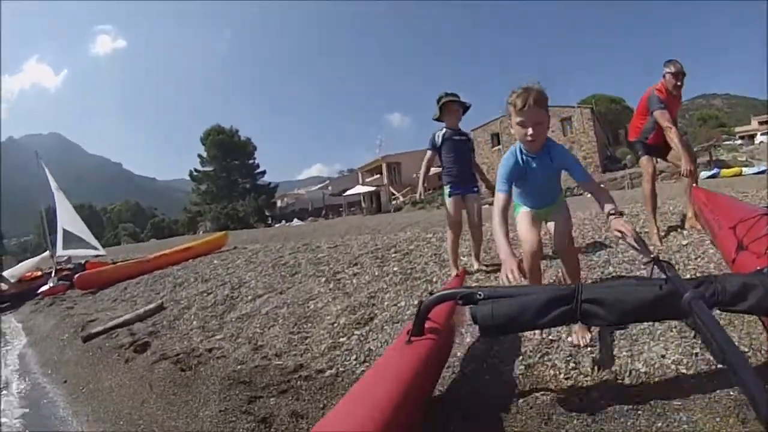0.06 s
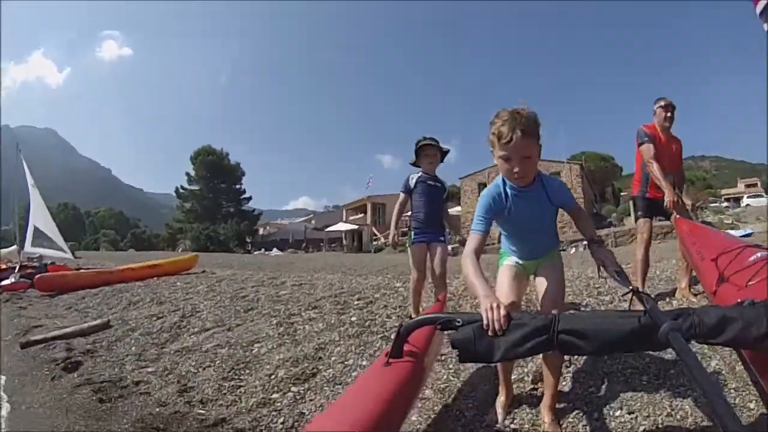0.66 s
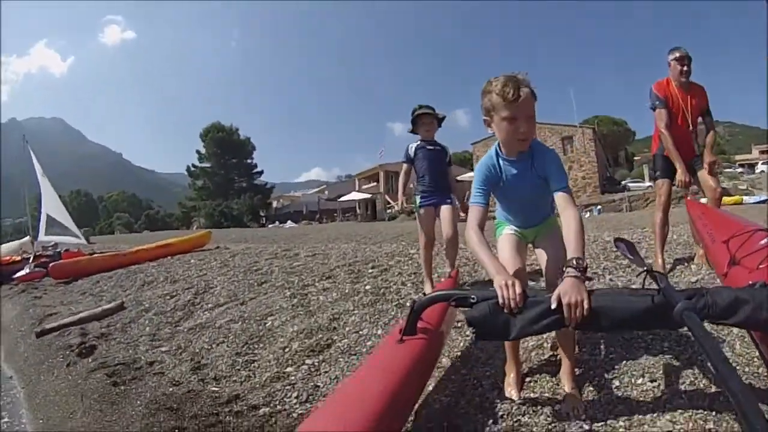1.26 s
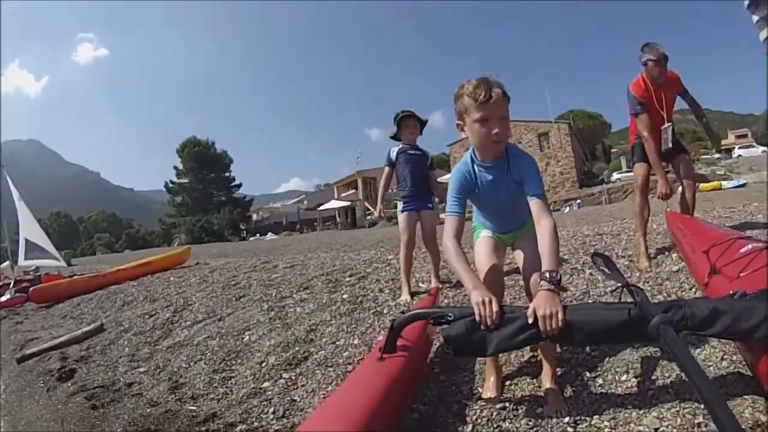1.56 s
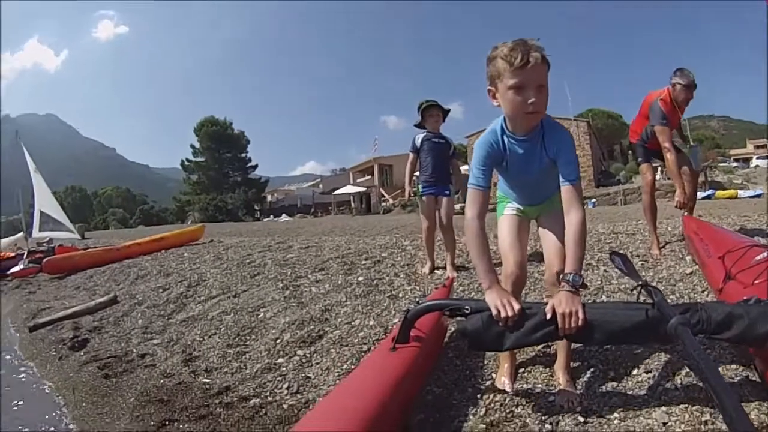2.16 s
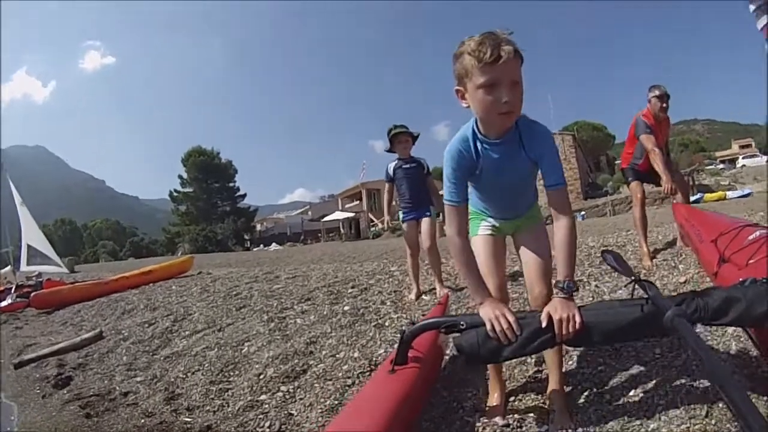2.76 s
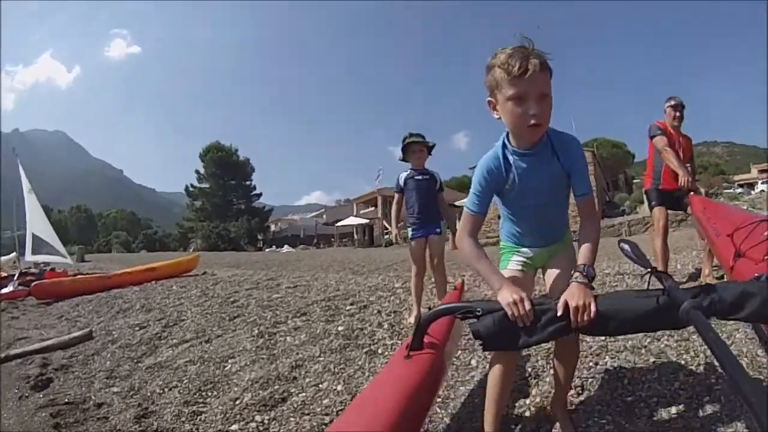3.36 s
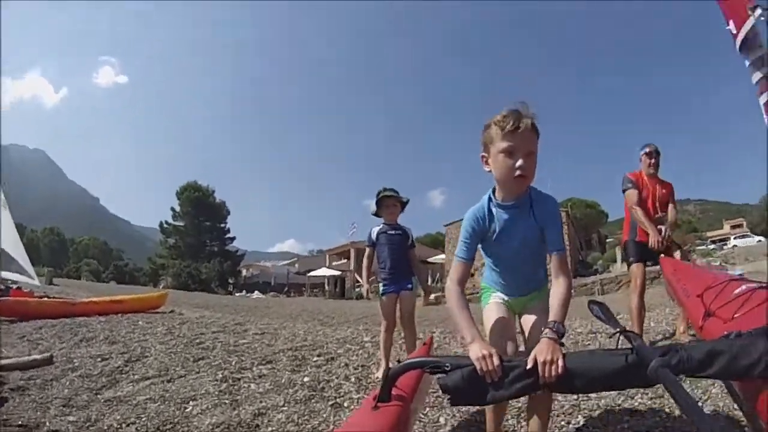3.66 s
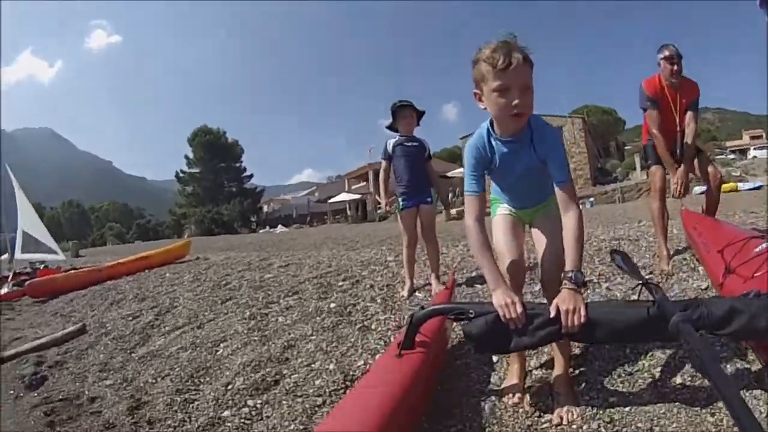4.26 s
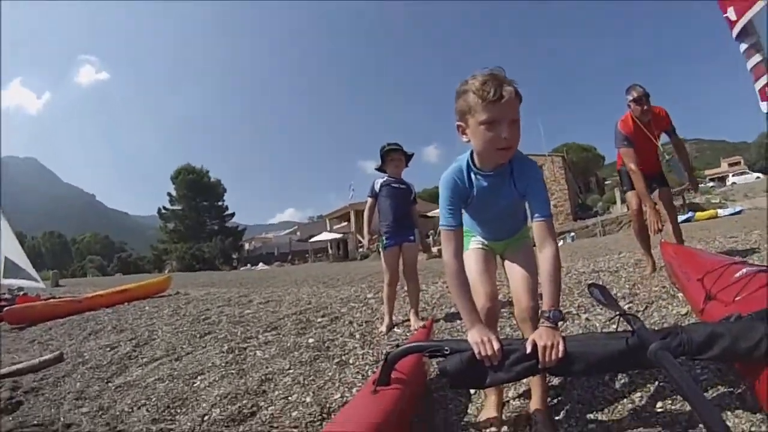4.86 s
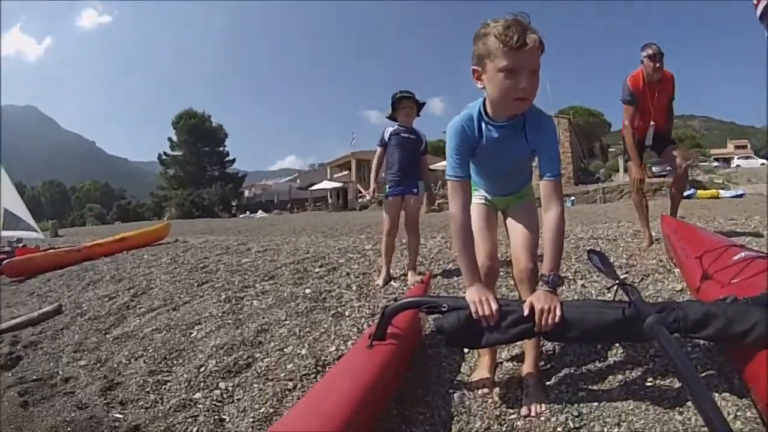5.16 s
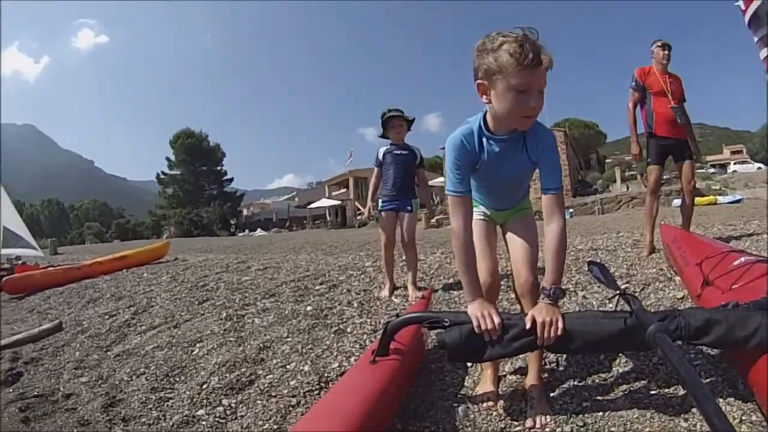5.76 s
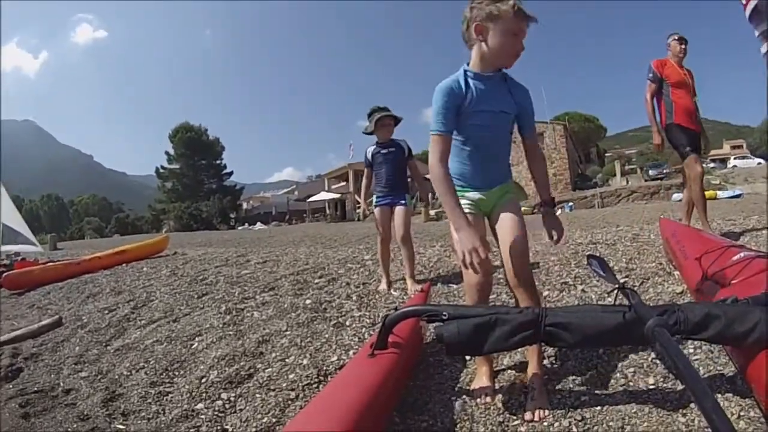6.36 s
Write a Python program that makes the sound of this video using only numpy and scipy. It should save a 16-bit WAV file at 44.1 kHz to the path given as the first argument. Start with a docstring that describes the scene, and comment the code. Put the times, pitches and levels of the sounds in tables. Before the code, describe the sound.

Sharp, hollow knocks and juddering scrapes as a plastic boat hull is dragged in short pulls across a pebble shore.

```python
"""Booming knocks and gritty scrapes: a plastic outrigger kayak is hauled up a pebble beach in short tugs.
At each tug the frame knocks and the hull booms, rebounds and judders in stick-slip.
Between knocks pebbles grind and rumble under the hull, sand trickles and the shore washes faintly.
Heard from a camera fixed to the frame; its limiter flattens the loudest knocks and recovers slowly."""
import sys
import numpy as np
from scipy import signal
from scipy.fft import rfft, irfft
from scipy.io import wavfile
from scipy.ndimage import uniform_filter1d, minimum_filter1d

SR = 44100
rng = np.random.default_rng(int(sys.argv[2]) if len(sys.argv) > 2 else 0)


def dump_mix(stems):
    """Bounce the given channels to the path in sys.argv[1] as a 16-bit WAV at rate SR."""
    frames = np.atleast_2d(stems).T  # one column per channel
    limited = np.clip(frames, -1, 1)  # hard clip at full scale
    pcm = np.round(limited * 32767).astype(np.int16)
    wavfile.write(sys.argv[1], SR, pcm)


N = 283122
T = np.arange(N) / SR
RING_S = 0.16
HARD_DB = -4  # heavier blows overload with a tick and throw the hull up

# blows on the frame: (time [s], level [dB], clack [relative dB], thud [relative dB],
# second contact [relative dB], hollow mode lift [dB], snap lift [dB])
KNOCKS = [(0.0554, 8.5, -5, -19, -34, 0, 15.5), (0.608, -28.5, -6.5, -4, -23, 0, -1),
          (0.683, -28.5, -20.5, 7, -5, -9, -3), (0.849, -32, -30, 1.5, -21, 4, -3),
          (1.1825, -7.5, -13, -10.5, -11, -2.5, 1), (1.2863, 3, -13, -17, -14.5, 2, 1),
          (1.353, -26.5, -4, 3.5, -17, -6.5, 3), (1.375, -22, -37, 5, -2.5, 0.5, -3.5),
          (1.6796, -23.5, 2, -21, -36, -2, -8), (1.783, -16, -3, -9, -12.5, -2, -5),
          (1.957, -39, -21, 1, -1, -2, -3), (2.1324, 1, -10, -16, -18.5, 0.5, -10),
          (2.195, -35.5, -33.5, 8.5, -16.5, -6.5, -6), (2.3508, 6.5, -18.5, -15, -23, -6, 10.5),
          (2.4263, -13.5, -14, 0, -1, -3.5, 12.5), (2.566, -18.5, -5, -14, -15, 3, -3),
          (2.602, -30.5, -8, 2.5, -3, 0, -3), (2.671, -26.5, 4.5, -20, -24, 8, -3),
          (3.2917, 10.5, -16, -18, -26, 1, 14), (3.784, -28.5, -30, -1, -3.5, 0, 1),
          (4.048, -20.5, 6, -0.5, -8, -7.5, -7.5), (4.071, -29.5, -14, 9.5, -16, -3, -3),
          (4.105, -30, 3.5, -12, -13, -3, -1), (4.192, 11.5, -11.5, -16, -3, 0.5, 8),
          (4.277, -13.5, 2.5, -8.5, -22, 6.5, 7), (4.352, -20, -9, -0.5, 0, -11, -1),
          (4.67, -39.5, 7.5, -18, -14, -6, -8), (4.938, -27, -27, 3, -2.5, 1, -3),
          (5.1159, 7.5, -15.5, -12, -34.5, -4.5, 9), (5.126, 6.5, -7.5, -13, -15, 4.5, 3),
          (5.616, -45, -16, 11, -2, -4, 6)]


def knocks(settle_s=0.013, scatter_s=0.0005):
    """Each knock is a blow, then a second contact as the hull settles."""
    out = np.zeros(N)
    for start_s, level_db, clack_db, thud_db, second_db, hollow_db, snap_db in KNOCKS:
        add(out, start_s, blow(level_db, clack_db, thud_db, hollow_db, snap_db))
        second_s = start_s + settle_s + scatter_s * rng.standard_normal()
        add(out, second_s, blow(level_db + second_db, clack_db, thud_db, hollow_db, snap_db))
    return out


def blow(level_db, clack_db, thud_db, hollow_db, snap_db):
    """A blow rings the hull, with a gritty crack and a snap of the frame's upper modes."""
    t = T[:int(RING_S * SR)]
    tilt_db_per_oct = 0.73 * np.clip(clack_db + 10, -15, 8)  # harder is brighter
    thud, boom, clack = hull_ring(tilt_db_per_oct, hollow_db)
    clack *= 1 - np.exp(-t / 0.002)  # the plastic gives before it rings
    grit = rng.standard_normal(len(t)) * rng.exponential(size=len(t))
    crack = unit(colour(grit, [(570, -8.5), (710, 5), (890, 3.5), (1130, 6), (1480, 12.5), (1800, -8.5),
                               (2200, -8.5), (2800, -14), (3300, -22.5), (5200, -21), (8000, -36.5),
                               (15000, -49.5)]))
    crack *= (1 - np.exp(-t / 0.0026)) * np.exp(-t / 0.0043)
    attack = emphasise(undb(-9) * clack + undb(-12.5) * crack, hz=2450, width_hz=670, db=snap_db)
    tick = overload_tick(grit, level_db) if level_db > HARD_DB else 0
    return undb(level_db) * (tick + undb(-1.5) * boom + undb(thud_db) * thud + undb(clack_db) * attack)


def hull_ring(tilt_db_per_oct, hollow_db=0, scatter_db=2, detune=0.033, travel_s=0.0013,
              rise_cycles=0.54):
    """Damped low, middle and high modes: thud, boom and clack, each with peak 1."""
    # hull and frame modes: (frequency [Hz], t60 [s], level [dB])
    hull_modes = [(43.5, 0.2, -4.5), (115.1, 0.13, 0.5), (172, 0.092, -12), (234.7, 0.06, 2),
                  (287.9, 0.05, 6.5), (486, 0.032, -7.5), (468, 0.047, -1), (705, .034, 2),
                  (740, 0.0078, -6), (1079, 0.023, 4.5), (1230, .014, -7), (1542, 0.019, -3.5),
                  (2133, 0.017, -17), (2360, 0.006, -23.5), (2713, 0.015, -20)]
    hz, t60_s, db = np.transpose(hull_modes)
    pitch_draw, level_draw = rng.standard_normal((len(hz), 2)).T
    # high bending waves travel faster: the clack arrives before the boom
    t = np.maximum(T[:int(RING_S * SR)] - travel_s * np.sqrt(hz[0] / hz)[:, None], 0)
    cycles = t * (hz * (1 + detune * pitch_draw))[:, None]
    db = db + hollow_db * ((hz > 400) & (hz < 950))  # depends on where the blow lands
    gain = undb(db + tilt_db_per_oct * np.log2(hz / hz[0]) + scatter_db * level_draw)
    gain *= (-1) ** np.arange(len(hz))  # neighbours swing in opposition, so the boom swells
    envelope = np.exp(-np.log(1000) * t / t60_s[:, None]) * (1 - np.exp(-(cycles / rise_cycles) ** 2))
    modes = gain[:, None] * np.sin(2 * np.pi * cycles) * envelope
    groups = [modes[band].sum(0) for band in (hz < 150, (hz >= 150) & (hz < 600), hz >= 600)]
    return [group / np.abs(group).max() for group in groups]


def overload_tick(grit, blow_db, delay_s=0.0055, width_s=0.001):
    """A sharp, bright tick of overload on the loudest knocks, growing with the blow."""
    # tick spectrum: (frequency [Hz], level [dB])
    spectrum = [(2500, -9.5), (3400, -2), (4800, 0.5), (7000, -4), (10000, -17.5), (15000, -17.5)]
    tick = colour(grit * np.exp(-np.abs(T[:len(grit)] - delay_s) / width_s), spectrum)
    return undb(-51 + 1.08 * blow_db) * tick / (np.abs(tick).max() + 1e-12)


def scrapes(unevenness=0.23, rasp_q=3.5):
    """Stick-slip makes the hull judder while crushed grit crunches and rasps."""
    # hull slides: (centre [s], length [s], slip rate [1/s], judder [dB], grit [dB], rasp [Hz])
    slides = [(0.864, 0.18, 198, -50, -59.5, 2500), (1.413, 0.03, 290, -31.5, -62, 1400),
              (1.537, 0.17, 470, -43, -51, 2200), (2.102, 0.08, 370, -38.5, -54.5, 1400),
              (2.6, 0.1, 198, -23.5, -58, 1300), (2.789, 0.25, 300, -40.5, -57.5, 1280),
              (2.98, 0.11, 325, -44, -59, 1280), (3.691, 0.19, 340, -47, -58, 1530),
              (3.94, 0.11, 200, -48, -54, 4700), (4.042, 0.049, 430, -30, -45.5, 2400),
              (4.083, 0.096, 235, -22.5, -50.5, 1270), (4.286, 0.068, 480, -23.5, -33.5, 1500),
              (4.469, 0.1, 244, -33, -72, 1290), (4.884, 0.12, 313, -41, -75, 1300),
              (5.589, 0.22, 330, -53, -57, 2630)]
    out = np.zeros(N)
    for centre_s, length_s, slips_per_s, judder_db, grit_db, rasp_hz in slides + rebounds():
        tilt_db_per_oct = -11 + 12.5 * np.log2(slips_per_s / 370)  # faster is brighter
        _, boom, _ = hull_ring(tilt_db_per_oct)
        n, start_s = int(length_s * SR), centre_s - length_s / 2
        swell = np.hanning(n)
        gaps = np.abs(1 + unevenness * rng.standard_normal(int(length_s * slips_per_s) + 2))
        at = (np.cumsum(gaps) / slips_per_s * SR).astype(int)
        slips = np.zeros(n)
        slips[at[at < n]] = 1
        judder = signal.fftconvolve(slips * swell, boom)
        grit = colour(contacts(per_s=2200, spread_db=3, size=n),
                      [(500, -16.5), (900, -1.5), (1500, 8), (2000, -9.5), (2450, 1), (3600, -11.5),
                       (7500, -17), (12000, -47.5)])
        grit = emphasise(grit, rasp_hz, rasp_hz / rasp_q, db=6.5)
        add(out, start_s - 0.005, undb(judder_db) * np.sqrt(2) * judder / np.abs(judder).max())
        add(out, start_s, undb(grit_db) * unit(grit) * swell)
    return out


def rebounds(delay_s=0.076, length_s=0.026, slips_per_s=370, rasp_hz=1300, cap_db=-22.5):
    """Scrape rows for the landing after each heavy blow; pebbles cushion the judder to a cap."""
    return [(start_s + delay_s, length_s, slips_per_s, min(db - 29, cap_db), db - 58, rasp_hz)
            for start_s, db, *_ in KNOCKS if db > HARD_DB]


def shudders(waver=0.17, rough_db=2.5):
    """The hull's floor wobbles unevenly for a few cycles as it rides over a stone."""
    # floor wobbles: (centre [s], length [s], pitch [Hz], level [dB])
    wobbles = [(0.728, 0.083, 95, -40), (1.172, 0.094, 86, -24), (1.404, .09, 100, -25.5),
               (1.703, .05, 128, -28.5), (2.203, .055, 107.3, -21.5), (2.622, .07, 123.7, -22),
               (3.747, 0.056, 102, -36), (4.509, 0.072, 110, -35), (4.678, .07, 115, -52),
               (4.975, 0.0874, 124.4, -29.5), (5.151, 0.065, 109.5, -17), (5.213, .08, 107.3, -32),
               (5.637, 0.057, 101, -45), (6.069, 0.093, 104, -43), (6.179, 0.13, 116, -43)]
    out, drift, push = np.zeros(N), walk(per_s=110), walk(per_s=80)
    for centre_s, length_s, hz, db in wobbles:
        n, i = int(length_s * SR), int((centre_s - length_s / 2) * SR)
        phase = 2 * np.pi * np.cumsum(hz * (1 + waver * drift[i:i + n])) / SR
        add(out, i / SR, np.sin(phase) * np.hanning(n) * undb(db + rough_db * push[i:i + n]))
    return out


def taps(rattle_s=0.0033, ring_cycles=7.5):
    """Stones flicked against the frame rattle and ring; the smaller and higher, the shorter."""
    # stone hits: (time [s], pitch [Hz], level [dB])
    stones = [(0.556, 1170, -51), (1.1292, 1360, -38), (1.9624, 1510, -47), (3.1935, 2540, -49),
              (3.4455, 2390, -43), (4.624, 1300, -49), (5.0742, 1480, -39.5), (5.4313, 6800, -63),
              (5.6218, 7600, -58), (5.6443, 6980, -55), (5.68, 2400, -45), (5.7445, 8000, -57),
              (5.935, 1367, -42)]
    out, t = np.zeros(N), T[:SR // 16]
    for start_s, hz, db in stones:
        rattle = rng.standard_normal(len(t)) * np.exp(-t / rattle_s)
        ring = np.sin(2 * np.pi * hz * t) * np.exp(-t * hz / ring_cycles)
        tap = signal.fftconvolve(rattle, ring)
        add(out, start_s, undb(db) * tap / np.abs(tap).max())
    return out


def hull_rumble(spurts):
    """The hull rumbles on rolling pebbles, louder as its weight bears on them."""
    # rumble spectrum: (frequency [Hz], level [dB])
    spectrum = [(50, -20), (85, -3.5), (115, 8), (160, 0.5), (225, 6.5), (300, -4), (400, -8.5),
                (490, -14.5), (600, -23), (1000, -31)]
    # rumble under load: (time [s], level [dB])
    load = [(0, -43), (.2, -57), (.8, -50), (1.0, -65), (1.36, -39.5), (1.49, -43.5), (1.65, -43),
            (1.88, -50), (2.08, -42), (2.27, -47.5), (2.45, -39.5), (2.7, -41), (3.2, -46.5), (3.52, -52),
            (3.95, -48), (4.25, -34.5), (4.6, -49), (5.08, -47), (5.35, -60), (5.85, -65), (6.16, -56),
            (6.42, -65)]
    return patter(spectrum, per_s=710, spread_db=-3) * undb(curve(load) + 4.8 * spurts)


def frame_sway():
    """The frame sways with a deep, wavering rumble."""
    # sway strength: (time [s], level [dB])
    levels = [(0, -29), (.3, -47.5), (1.3, -44), (1.95, -36.5), (2.5, -48.5), (3.0, -49.5), (3.5, -44),
              (4.05, -43), (4.5, -34), (5.0, -37.5), (5.4, -42.5), (5.9, -59.5), (6.1, -50), (6.42, -66.5)]
    spectrum = [(15, -29), (28, -6), (44, -2), (65, -6), (100, -30.5), (200, -47)]
    return unit(colour(rng.standard_normal(N), spectrum)) * undb(curve(levels) + 0.83 * walk(per_s=6.6))


def pebble_grind(spurts):
    """Pebbles grind under the hull in uneven spurts."""
    # grinding spectrum: (frequency [Hz], level [dB])
    spectrum = [(400, -25), (690, -5.5), (880, -10.5), (1100, 2), (1300, -2.5), (1550, 1.5), (1850, -29),
                (2500, -19.5), (3500, -37)]
    # grinding strength: (time [s], level [dB])
    levels = [(0, -57), (.3, -67), (.8, -61), (1.0, -69.5), (1.5, -63), (2.28, -75), (2.48, -56.5),
              (2.78, -58), (3.12, -60.5), (3.4, -60), (3.72, -58), (3.81, -65.5), (3.9, -56), (4.1, -53.5),
              (4.42, -56.5), (4.78, -66), (5.05, -56), (5.3, -64), (5.6, -61), (6.42, -72.5)]
    return patter(spectrum, per_s=1600, spread_db=2.5) * undb(curve(levels) + 1.5 * spurts)


def shore_wash():
    """The shore washes in slow swells; larger stones clink in it and tiny ones tick."""
    # wash spectrum: (frequency [Hz], level [dB])
    wash_spectrum = [(300, 1.5), (800, -1.5), (1300, -6.5), (1620, 6), (1950, -8), (2500, 2.5), (3050, -2),
                     (3600, -10), (4700, -8), (5900, -12.5), (7200, -17.5), (9700, -22), (12000, -25.5),
                     (15500, -45)]
    # spectrum of tiny stones: (frequency [Hz], level [dB])
    tick_spectrum = [(2500, -11), (4800, -0.5), (7500, -2), (11000, -9), (15000, -15.5)]
    # swell of the wash: (time [s], level [dB])
    swell = [(0, -63), (.37, -65.5), (.85, -58.5), (1.2, -59.5), (1.75, -62), (2.2, -61), (3.2, -59.5),
             (3.6, -60), (4.1, -60.5), (4.6, -63.5), (5.3, -61.5), (5.52, -58), (6.0, -56), (6.42, -60)]
    wash = patter(wash_spectrum, per_s=11000, spread_db=-1)
    stones = undb(-10.5) * clinks(per_s=510, spread_db=4)
    ticks = undb(-22) * patter(tick_spectrum, per_s=160, spread_db=3)
    return (wash + stones + ticks) * undb(curve(swell) + 0.8 * walk(per_s=41))


def clinks(per_s, spread_db, lowest_hz=1100, octaves=2.2):
    """Pebbles of many sizes tap one another, each with its own brief ring."""
    out, t = np.zeros(N), T[:SR // 40]
    for when, pitch, force in rng.random((int(per_s * N / SR), 3)):
        hz = lowest_hz * 2 ** (octaves * pitch)
        ring = np.sin(2 * np.pi * hz * t) * np.exp(-t * hz / 4)
        db = spread_db * min(-np.log(1 - force), 3) - 9 * pitch
        add(out, when * N / SR, undb(db) * ring)
    return unit(out)


def sand(spurts):
    """Sand trickles along the hull throughout and sings higher as it slides in spills."""
    # rustle spectrum: (frequency [Hz], level [dB])
    spectrum = [(3000, -5), (4800, -8), (5900, -6.5), (7200, -1.5), (8200, -7), (9600, -14.5),
                (11400, -11.5), (13000, -16.5), (15500, -32)]
    # trickle strength: (time [s], level [dB])
    trickle = [(0, -71.5), (.35, -83.5), (.7, -72), (2.3, -70), (4.7, -70.5), (5.25, -76), (5.6, -71),
               (6.0, -73), (6.42, -75)]
    # sand spills: (centre [s], length [s], level [dB])
    spills = [(1.54, 0.15, -68.5), (1.656, 0.15, -74), (1.765, 0.13, -66), (2.95, 1, -83),
              (3.687, 0.49, -67), (4.034, 0.085, -59)]
    rustle = patter(spectrum, per_s=6800, spread_db=3)
    sliding = unit(emphasise(rustle, hz=7300, width_hz=1200, db=3.5))
    flow = np.zeros(N)
    for centre_s, length_s, db in spills:
        add(flow, centre_s - length_s / 2, undb(db) * np.hanning(int(length_s * SR)))
    return (rustle * undb(curve(trickle)) + sliding * flow) * undb(0.8 * spurts)


def through_frame(x):
    """The frame passes almost nothing at its antiresonances."""
    # antiresonances: (frequency [Hz], width [Hz])
    notches = [(582, 100), (910, 32)]
    for hz, width_hz in notches:
        x = signal.lfilter(*signal.iirnotch(hz, hz / width_hz, fs=SR), x)
    return x


def through_housing(x):
    """The camera's plastic housing adds a hollow colour."""
    # housing resonances and dips: (frequency [Hz], width [Hz], gain [dB])
    resonances = [(1240, 53, 3), (1620, 110, -3), (1980, 220, 1.5), (2120, 86, 3.5), (2670, 59, 2),
                  (2714, 200, -6.5), (3100, 86, 2), (3200, 400, -1.5), (5960, 500, -2.5), (7200, 900, -1.5)]
    for hz, width_hz, db in resonances:
        x = emphasise(x, hz, width_hz, db)
    return x


def contacts(per_s, spread_db, size=N):
    """Random impulses; a few stand out, or fall back if the spread is negative."""
    strength = undb(spread_db * np.minimum(rng.exponential(size=size), 6))
    return (rng.random(size) < per_s / SR) * strength * rng.choice([-1, 1], size)


def patter(spectrum, per_s, spread_db):
    """Random contacts ringing with the given spectrum, rms 1."""
    return unit(colour(contacts(per_s, spread_db), spectrum))


def colour(x, spectrum, size=2 ** 13):
    """Minimum-phase filter from (frequency [Hz], level [dB]) points: clicks ring after their onset."""
    hz, db = np.transpose(spectrum)
    f = np.maximum(np.fft.rfftfreq(size, 1 / SR), 1)
    log_gain = np.log(undb(np.interp(np.log(f), np.log(hz), db)))
    rolloff = np.maximum(np.log(f / hz[-1]), 0) + np.maximum(np.log(hz[0] / f), 0)
    cepstrum = irfft(log_gain - rolloff)
    cepstrum[1:size // 2] *= 2
    cepstrum[size // 2 + 1:] = 0
    return signal.fftconvolve(x, irfft(np.exp(rfft(cepstrum))))[:len(x)]


def emphasise(x, hz, width_hz, db):
    """Lift or lower one resonance."""
    return x + (undb(db) - 1) * signal.lfilter(*signal.iirpeak(hz, hz / width_hz, fs=SR), x)


def walk(per_s):
    """Smooth random wavering, spread near 1."""
    step = max(int(SR / per_s), 1)
    return 1.2 * uniform_filter1d(np.repeat(rng.standard_normal(N // step + 1), step), step)[:N]


def curve(points):
    """Join (time [s], level [dB]) points by straight lines."""
    return np.interp(T, *np.transpose(points))


def add(out, start_s, x):
    """Mix x into out from start_s."""
    i = max(int(start_s * SR), 0)
    out[i:i + len(x)] += x[:max(N - i, 0)]


def undb(db):
    """Decibels to gain."""
    return 10 ** (np.asarray(db) / 20)


def unit(x):
    """Scale to rms 1."""
    return x / np.sqrt(np.mean(x ** 2) + 1e-20)


def scene():
    """One microphone in the housing; knocks and scrapes reach it through the frame."""
    kayak = through_frame(knocks() + scrapes()) + shudders() + taps()
    spurts = walk(per_s=30)  # shared unevenness of the drag
    dragging = hull_rumble(spurts) + frame_sway() + pebble_grind(spurts)
    return through_housing(kayak + dragging + shore_wash() + sand(spurts))[None]


def record(dry):
    """A limiter ducks at once at each overload and recovers slowly; the top is cut."""
    window_samples, release_db_per_s, cutoff_hz = 110, 23, 15500
    over_db = 20 * np.log10(np.maximum(np.abs(dry[0]), 1))
    held_db = -minimum_filter1d(-over_db, window_samples)
    duck_db = np.maximum.accumulate(held_db + release_db_per_s * T) - release_db_per_s * T
    limited = dry * undb(-uniform_filter1d(duck_db, window_samples))
    return signal.sosfilt(signal.ellip(8, 0.2, 70, cutoff_hz, fs=SR, output="sos"), limited)


dry = scene()
out = record(dry)
dump_mix(out)
```